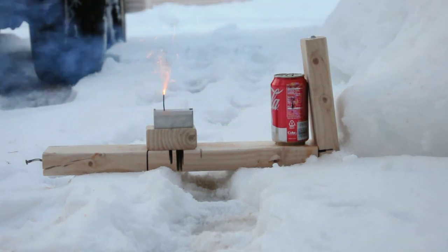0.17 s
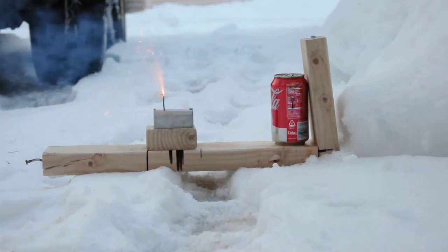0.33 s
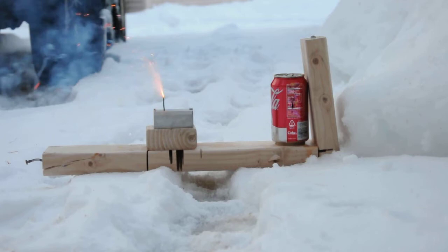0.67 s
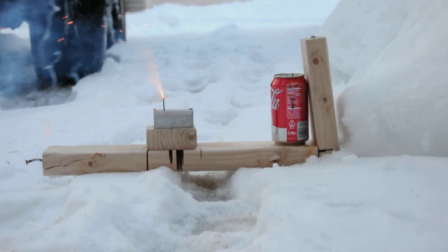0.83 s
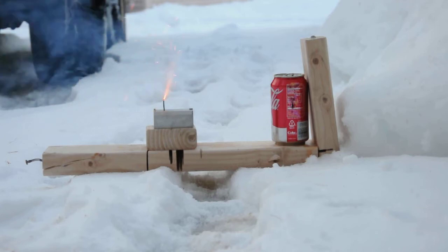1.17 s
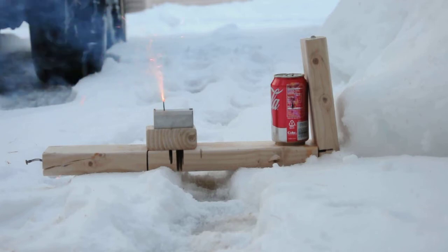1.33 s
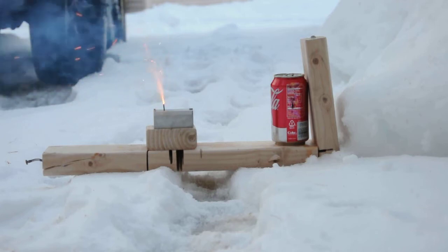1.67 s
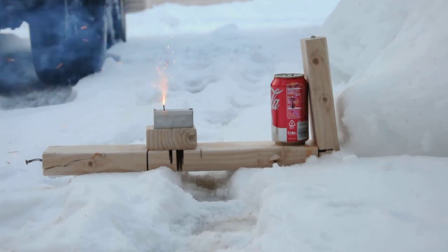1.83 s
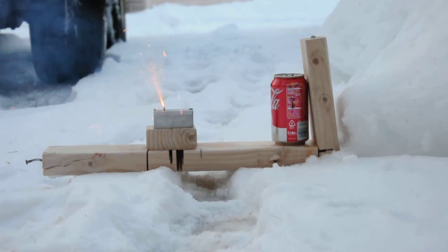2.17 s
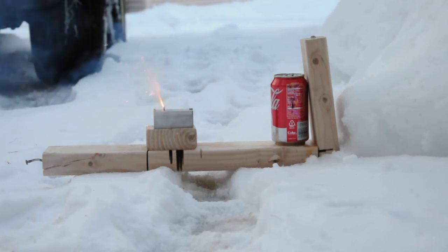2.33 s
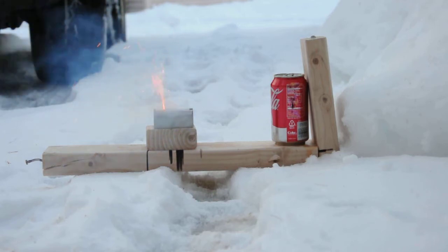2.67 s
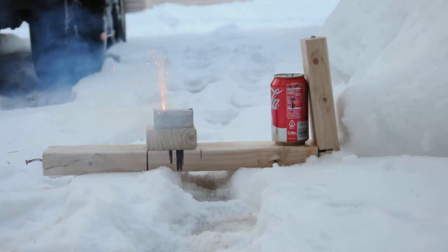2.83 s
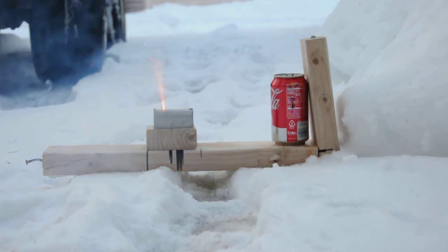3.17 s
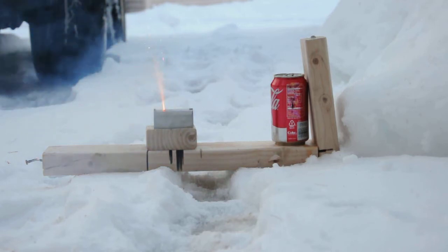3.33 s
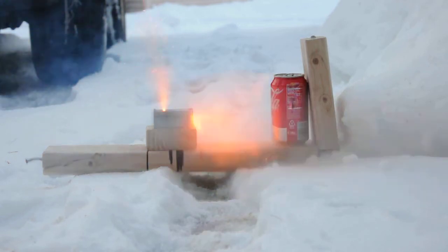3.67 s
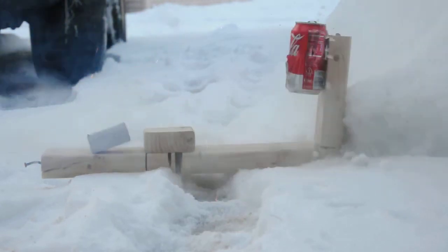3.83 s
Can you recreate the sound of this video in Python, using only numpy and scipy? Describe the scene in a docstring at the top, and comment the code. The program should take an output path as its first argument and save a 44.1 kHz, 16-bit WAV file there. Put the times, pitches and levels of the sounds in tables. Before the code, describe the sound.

A tiny cannon's loud sharp blast, preceded by a sputtering fuse, rolls away across snowy open ground

```python
"""A fuse hisses and sputters over a faint outdoor hum, with one dull thump early on: a miniature black powder
cannon stands on a plank in open snow. Fuse, priming and touch hole are gas noise shaped by spectrum and envelope.
The charge is an N-shaped pulse, a shock and muzzle gas, overloading a narrow-band microphone. The report rolls
back as scattered returns, each band decaying at its own rate, while flung things knock down as damped noise."""
import sys
import numpy as np
from scipy import signal
from scipy.fft import rfft, irfft
from scipy.io import wavfile

SR = 44100
rng = np.random.default_rng(int(sys.argv[2]) if len(sys.argv) > 2 else 0)


def to_wav(sig):
    """Store sig (one row per channel, or 1-D mono) as 16-bit WAV at the path in sys.argv[1].

    Samples outside -1..1 are clipped; the rate is SR.
    """
    pcm = np.clip(np.atleast_2d(sig), -1, 1) * 32767
    pcm = np.round(pcm).astype(np.int16)
    wavfile.write(sys.argv[1], SR, pcm.T)  # frames by channels


N = 176400
T = np.arange(N) / SR  # time of each sample, s
HZ = np.maximum(np.fft.rfftfreq(N, 1 / SR), 1)  # frequency of each spectral bin

# Spectra give relative density, since the noise is scaled to unit rms; T60 is the time to decay by 60 dB.
# Main blast spectrum: (frequency [Hz], density [dB per Hz])
BLAST_SPECTRUM = [(25, -8), (85, -22), (150, -4), (230, -3), (340, 4), (500, 4.5), (700, -3.5), (950, 0.5),
                  (1400, -1), (2200, 3), (3200, -5), (4300, -3), (5500, -13)]
# Near echoes of the blast: (time [s], level [dB])
BLAST_ECHOES = [(3.686, -16), (3.695, -14), (3.7045, -26), (3.711, -17), (3.717, -20)]
# Near echo spectrum: (frequency [Hz], density [dB per Hz])
ECHO_SPECTRUM = [(40, -16), (85, -20), (130, 3.5), (200, 1.5), (400, 5.5), (900, -2.5), (2000, -10),
                 (5000, -25)]
# Rolling report: (frequency [Hz], density [dB per Hz], decay T60 [s])
ROLL_BANDS = [(40, -19, .6), (85, -7.5, 0.54), (130, -3.5, 0.66), (210, -5, 0.72), (380, 4.5, 0.95),
              (600, -3, 1.4), (1000, -1.5, 2.04), (1500, -9.5, 2.35), (2400, -10, 2.36), (3600, -14.5, 2),
              (5510, -21.5, 1.5)]
# Low puff of the priming: (frequency [Hz], density [dB per Hz])
FLASH_SPECTRUM = [(60, -13), (300, -6), (800, -8), (1400, -17.5), (2500, -6.5), (5000, -16)]
# Gas jet from the touch hole: (frequency [Hz], density [dB per Hz])
JET_SPECTRUM = [(200, -31.5), (1500, -16), (3000, -4), (4200, 1.5), (6000, -2.5)]
# Strength of the fuse's hiss: (time [s], level [dB])
FUSE_LEVEL = [(0.0, -41), (0.02, -43.5), (0.17, -40.5), (0.25, -46), (0.29, -38.5), (0.36, -45), (0.4, -41),
              (0.45, -45.5), (0.58, -40), (0.6, -42), (0.68, -39), (0.74, -42.5), (0.82, -39.5),
              (0.84, -43), (0.91, -47.5), (0.92, -42), (0.97, -44), (1.01, -38), (1.07, -42.5),
              (1.28, -40.5), (1.31, -38), (1.35, -43), (1.48, -38.5), (1.52, -44), (1.59, -37.5),
              (1.61, -41), (1.71, -39), (1.74, -40.5), (1.77, -37), (1.82, -42), (1.99, -40.5),
              (2.27, -43.5), (2.28, -37), (2.31, -43.5), (2.36, -39.5), (2.38, -42.5), (2.61, -45),
              (2.66, -41), (2.99, -39), (3.6, -42)]
# Treble of the hiss against its middle: (time [s], level [dB])
FUSE_BRIGHTNESS = [(0, -4), (.5, -2.5), (1.0, -1), (2.0, 0), (2.55, 1), (2.8, 2.5), (3.6, 5.5)]
# Hiss spectrum: (frequency [Hz], density [dB per Hz])
HISS_SPECTRUM = [(300, -23.5), (900, -15), (1350, -16), (1800, -7), (2300, 0), (3500, -0.5), (4700, -1),
                 (6000, -5)]
# Narrow resonances and notches in the hiss: (frequency [Hz], width [Hz], lift [dB])
HISS_RESONANCES = [(1142, 62, 10.5), (1505, 59, 7), (1614, 30, 8.5), (1706, 30, 11), (1852, 43, 10),
                   (2020, 35, -11), (2098, 53, 9), (2275, 63, 4.5), (2390, 40, -6.5), (2496, 100, 3.5),
                   (2590, 60, 1.5), (2780, 43, 1.5), (2840, 50, 3.5), (2960, 45, 4.5), (3308, 59, 6.5),
                   (3410, 36, -4.5), (3576, 190, 5.5), (3860, 55, 6.5), (4110, 55, 2.5), (4370, 39, 8),
                   (4460, 35, -5.5), (4600, 86, 3.5), (4840, 52, 1), (5124, 65, 6.5)]
# Flung things coming down: (time [s], level [dB], rise [s], decay T60 [s])
KNOCK_EVENTS = [(3.767, -44, .002, .06), (3.805, -23, 0.0096, 0.28), (3.878, -33, .001, 0.05),
                (3.909, -27, 0.0011, 0.022), (3.935, -36, .015, .22), (3.967, -24, .001, 0.068)]
# Knock spectrum: (frequency [Hz], density [dB per Hz])
KNOCK_SPECTRUM = [(100, -14), (500, 1), (1100, 0.5), (1800, -6), (2800, -5.5), (4500, -5.5), (6000, -16)]
# Dull thump and its echoes: (time [s], level [dB])
THUMP_HITS = [(0.216, -36), (.2190, -34), (0.2256, -30.5), (.341, -43.5), (.384, -43)]
# Thump noise spectrum: (frequency [Hz], density [dB per Hz])
THUMP_SPECTRUM = [(110, -18), (170, -1), (300, -1), (480, -1.5), (620, -9), (770, -5.5), (1050, -10.5),
                  (1600, -19), (4000, -42)]
# Thump resonances: (frequency [Hz], level [dB], decay T60 [s])
THUMP_RESONANCES = [(162, -9.5, 0.15), (281, -4, .07), (452, -0.5, 0.038), (505, -2.5, .06),
                    (754, -13, .06)]
# Outdoor background: (frequency [Hz], density [dB per Hz])
AIR_SPECTRUM = [(20, -34), (45, -13.5), (90, -6.5), (150, -9), (250, 0), (380, 0.5), (600, -1), (900, -0.5),
                (1300, -7), (2000, -4.5), (6000, -20)]
# Faint hum: (frequency [Hz], level [dB rms])
HUM_TONES = [(59.2, -67), (118.4, -71), (177.6, -66.5), (242.2, -62)]
# Brief level dips after the shot: (time [s], width [s], depth [dB])
LEVEL_DIPS = [(3.693, 0.00082, 20), (3.702, 0.00089, 17), (3.707, 0.00043, 1)]

SHOT_S, ATTACK_S = 3.6612, 0.00066
PULSE_S, PULSE_DB = 0.00248, -10
SHOCK_DB, SHOCK_HOLD_S, SHOCK_T60_S = -7.5, 0.0057, .01  # the hold counts from the shot
BLAST_DB, BLAST_T60_S, BLAST_ROUGH_DB = -8.5, 0.16, 0.9
ECHO_T60_S = .04
ROLL_DB, ROLL_RISE_S, ROLL_PATCHY_DB = -19, 0.015, 2
RETURNS_PER_S, RETURN_SPREAD_DB, RETURNS_DB = 2000, 2.5, -0.5
FLASH_S, FLASH_RISE_S, FLASH_DB, FLASH_T60_S = 3.613, 0.016, -32, .25
VENT_DB, VENT_RISE_S = -30, 0.044
JET_S, JET_RISE_S, JET_DB, JET_T60_S = 3.6505, 0.0078, -8.5, 0.035
FUSE_DB, TREBLE_HZ, FLUTTER_DB, FLUTTER_PER_S = 0.57, 3000, 0.69, 35
SPARKS_PER_S, SPARK_DB, SPARK_SPREAD_DB = 980, -12.5, 6
THUMP_T60_S, THUMP_TAIL_DB, THUMP_TAIL_T60_S = 0.065, -15.5, 0.75
THUMP_LOW_HZ, THUMP_RISE_S = 136, .001
AIR_DB = -48
MIC_TOP_HZ, MIC_STOP_HZ, CUTOFF_HZ = 5180, 6550, 15750
OVERLOAD = .72  # amplitude that the overloaded output approaches


def blast():
    """Impulsive radiation: an N-shaped pulse, a short violent shock, ragged muzzle gas and near echoes."""
    age = T - SHOT_S
    phase = age / PULSE_S
    pulse = from_db(PULSE_DB) * (1 - 2 * phase) * ((phase > 0) & (phase < 1))
    shock_rise = np.clip(age / ATTACK_S, 0, 1)
    shock_decay = 1000 ** -np.clip((age - SHOCK_HOLD_S) / SHOCK_T60_S, 0, 10)
    shock = from_db(SHOCK_DB) * shock_rise * shock_decay
    gas = from_db(BLAST_DB + BLAST_ROUGH_DB * drift(200)) * burst(SHOT_S, ATTACK_S, BLAST_T60_S)
    echoes = sum(from_db(db) * burst(start, ATTACK_S, ECHO_T60_S) for start, db in BLAST_ECHOES)
    return pulse + (shock + gas) * noise(BLAST_SPECTRUM) + echoes * noise(ECHO_SPECTRUM)


def roll():
    """Reverberation: scattered returns from the surroundings; each band dies unevenly at its own rate."""
    scattered = from_db(RETURNS_DB) * clicks(RETURNS_PER_S, RETURN_SPREAD_DB)
    returns = rng.standard_normal(N) + scattered
    spectrum = rfft(colour(returns, over_hz(ROLL_BANDS)))
    out = 0
    for hz, _, t60 in ROLL_BANDS:
        # a band is 1 at its own frequency and falls to 0 at its neighbours
        weight = over_hz([(row[0], row[0] == hz) for row in ROLL_BANDS])
        band = irfft(spectrum * weight, N)
        patches = from_db(ROLL_PATCHY_DB * drift(40))
        out = out + band * burst(SHOT_S, ROLL_RISE_S, t60) * patches
    return from_db(ROLL_DB) * out


def ignition():
    """Gas jet noise: the priming puffs, the touch hole hisses harder and harder, then spits a sharp jet."""
    flash = from_db(FLASH_DB) * noise(FLASH_SPECTRUM) * burst(FLASH_S, FLASH_RISE_S, FLASH_T60_S)
    vent = from_db(VENT_DB) * burst(FLASH_S, VENT_RISE_S, FLASH_T60_S)
    # squaring curves the rise and halves the doubled decay time
    jet = from_db(JET_DB) * burst(JET_S, JET_RISE_S, 2 * JET_T60_S) ** 2
    return flash + (vent + jet) * noise(JET_SPECTRUM)


def fuse():
    """Turbulence and resonance: a fluttering gas jet with tiny sparks, in fixed resonances, until the shot."""
    sparks = from_db(SPARK_DB) * clicks(SPARKS_PER_S, SPARK_SPREAD_DB)
    lift_db = sum(db / (1 + (2 * (HZ - hz) / width) ** 2) for hz, width, db in HISS_RESONANCES)
    hiss = colour(rng.standard_normal(N) + sparks, over_hz(HISS_SPECTRUM) + lift_db)
    treble = irfft(rfft(hiss) / (1 + (TREBLE_HZ / HZ) ** 8), N)
    # half the brightness raises the treble, the other half lowers the rest
    tilt = from_db(in_time(FUSE_BRIGHTNESS) / 2)
    tilted = treble * tilt + (hiss - treble) / tilt
    level = from_db(FUSE_DB + in_time(FUSE_LEVEL) + FLUTTER_DB * drift(FLUTTER_PER_S))
    return tilted * level * (T < SHOT_S)


def knocks():
    """Damped impact: short knocks and scuffs of noise after the shot."""
    envelope = sum(from_db(db) * burst(start, rise, t60) for start, db, rise, t60 in KNOCK_EVENTS)
    return noise(KNOCK_SPECTRUM) * envelope


def thump():
    """Modal excitation: a soft, uneven bump on a hollow body, with a short tail and faint echoes."""
    hits, power = np.zeros(N), 0
    for start, db in THUMP_HITS:
        hits[int(start * SR)] += from_db(db)
        body = burst(start, THUMP_RISE_S, THUMP_T60_S)
        tail = from_db(THUMP_TAIL_DB) * burst(start, THUMP_RISE_S, THUMP_TAIL_T60_S)
        power = power + (from_db(db) * (body + tail)) ** 2
    rings = sum(from_db(db) * ring(hits, hz, t60) for hz, db, t60 in THUMP_RESONANCES)
    low_cut = signal.butter(4, THUMP_LOW_HZ, "high", fs=SR, output="sos")
    return signal.sosfilt(low_cut, noise(THUMP_SPECTRUM) * np.sqrt(power) + rings)


def background():
    """Superposition: open-air noise and a faint hum of sines whose phases waver slightly."""
    hum = 0
    for hz, db in HUM_TONES:
        phase = 2 * np.pi * hz * T + .5 * drift(2)
        hum = hum + from_db(db) * np.sqrt(2) * np.sin(phase)  # root 2 turns rms into peak
    return from_db(AIR_DB) * noise(AIR_SPECTRUM) + hum


def microphone(x):
    """Band limitation: response rolls off at the top frequency and is 70 dB down a little higher."""
    x = signal.sosfilt(signal.butter(10, MIC_TOP_HZ, fs=SR, output="sos"), x)
    return signal.sosfilt(signal.cheby2(18, 70, MIC_STOP_HZ, fs=SR, output="sos"), x)


def from_db(db):
    """Logarithmic level: decibels to amplitude gain."""
    return np.exp(np.asarray(db) * (np.log(10) / 20))


def rms_one(x):
    """Normalisation: scale to unit rms."""
    return x / np.sqrt(np.mean(x ** 2) + 1e-20)


def in_time(rows):
    """Linear interpolation: a control curve at every sample."""
    return np.interp(T, *np.transpose(rows))


def over_hz(rows):
    """Logarithmic frequency interpolation: a spectrum table at every frequency."""
    hz, value = np.transpose(rows)[:2]
    return np.interp(np.log(HZ), np.log(hz), value)


def colour(x, spectrum_db):
    """Spectral shaping: weight x by a spectrum within the microphone's range; unit rms."""
    return rms_one(irfft(rfft(x) * from_db(spectrum_db) * (HZ < MIC_STOP_HZ), N))


def noise(rows):
    """Filtered random pressure: noise with the tabled spectrum; unit rms."""
    return colour(rng.standard_normal(N), over_hz(rows))


def drift(rate_hz):
    """Low-pass random process: slow chance variation of unit rms."""
    return rms_one(irfft(rfft(rng.standard_normal(N)) / (1 + (HZ / rate_hz) ** 2), N))


def burst(start, rise, t60):
    """Damped envelope: a straight rise, then an exponential decay."""
    out = np.zeros(N)
    live = slice(*np.searchsorted(T, [start, start + rise + 2 * t60]))
    age = T[live] - start
    decay = np.exp(-np.log(1000) * np.maximum(age - rise, 0) / t60)
    out[live] = np.minimum(age / rise, 1) * decay
    return out


def clicks(per_s, spread_db):
    """Random point process: clicks of uneven size and either sign; unit rms."""
    signs = rng.choice([-1, 1], N)
    sizes = signs * from_db(spread_db * np.minimum(rng.exponential(1, N), 5))
    return rms_one(sizes * (rng.random(N) < per_s / SR))


def ring(hits, hz, t60):
    """Damped oscillator: a unit hit starts a decaying sine of initial height 1."""
    radius = np.exp(-np.log(1000) / (t60 * SR))
    angle = 2 * np.pi * hz / SR
    feedback = [1, -2 * radius * np.cos(angle), radius * radius]
    return signal.lfilter([0, np.sin(angle)], feedback, hits + 1e-18)


def scene():
    """Superposition: the pressures of all sources add at the microphone."""
    return (blast() + roll() + ignition() + fuse() + knocks() + thump() + background())[None]


def record(dry):
    """Saturation: brief level dips, the narrow-band microphone, smooth overload, then a top cut."""
    dips_db = sum(db * np.exp(-np.minimum(((T - s) / width) ** 2, 20)) for s, width, db in LEVEL_DIPS)
    x = microphone(dry * from_db(-dips_db))
    clipped = x / (1 + np.abs(x / OVERLOAD) ** 8) ** (1 / 8)
    top_cut = signal.firwin(401, CUTOFF_HZ, window="blackman", fs=SR)
    return signal.fftconvolve(clipped, top_cut[None], "same")


dry = scene()
out = record(dry)
to_wav(out)
```